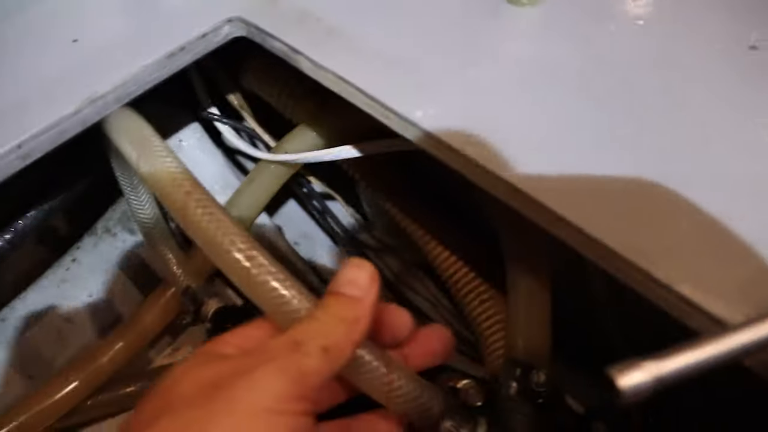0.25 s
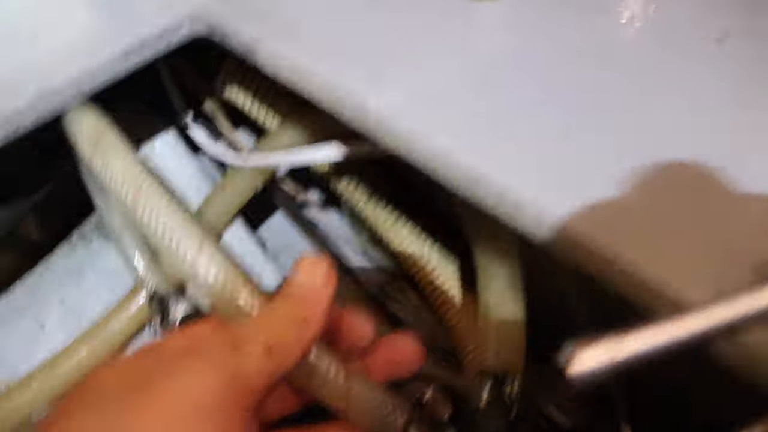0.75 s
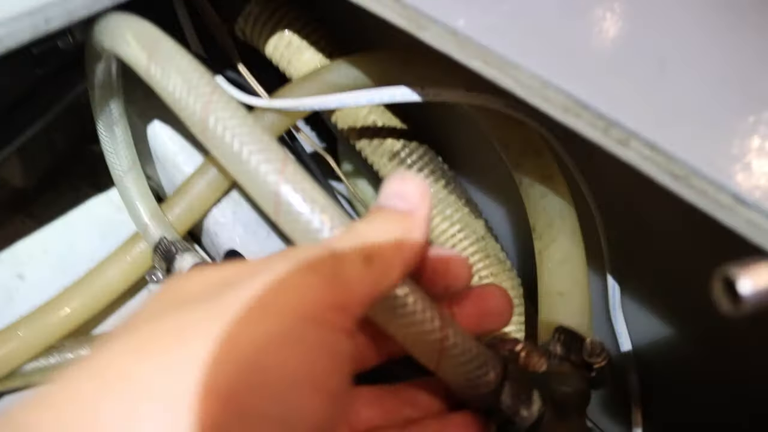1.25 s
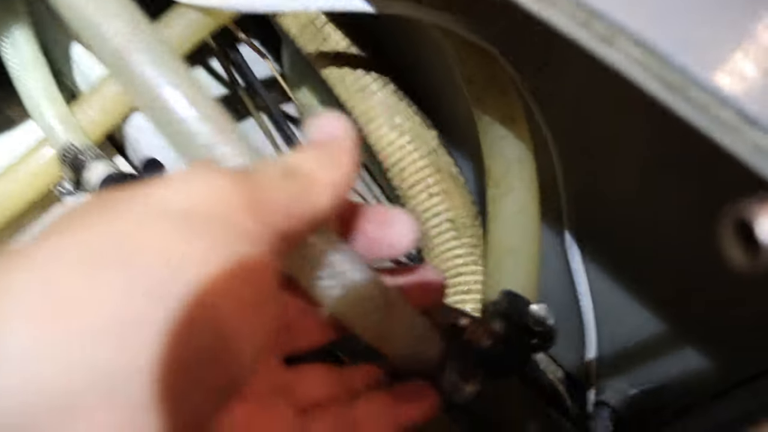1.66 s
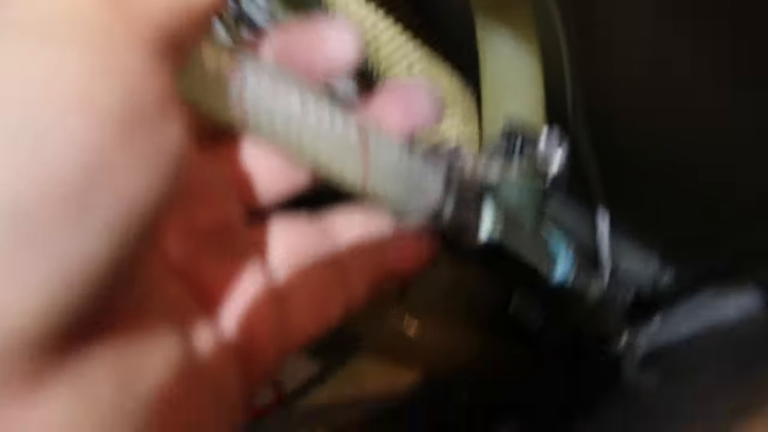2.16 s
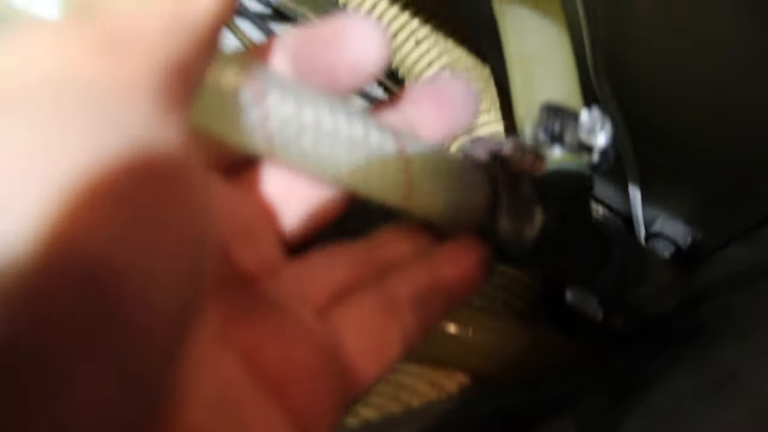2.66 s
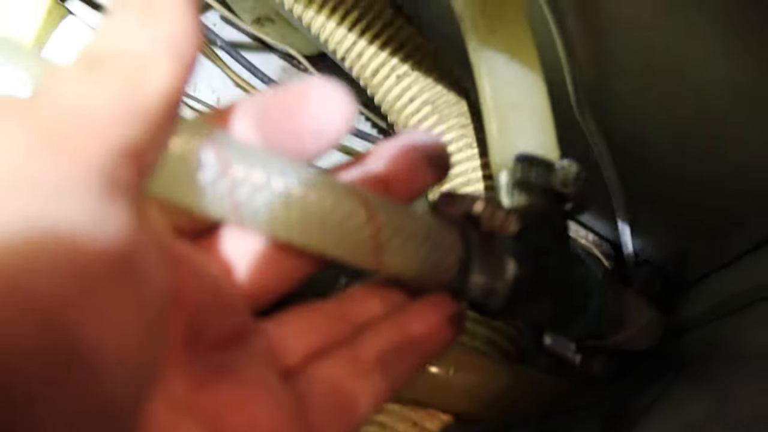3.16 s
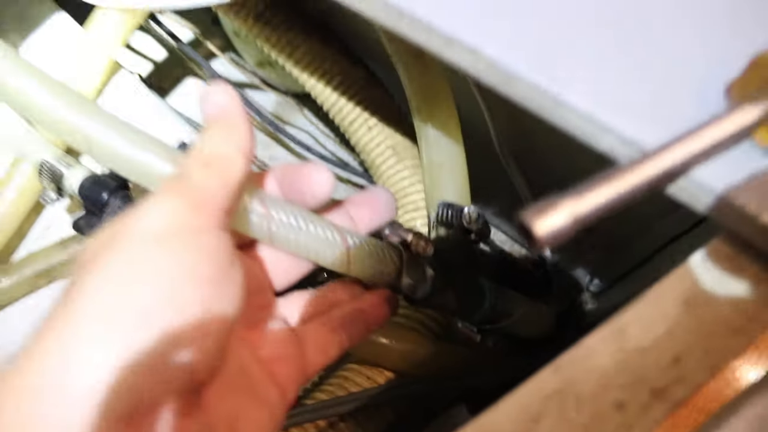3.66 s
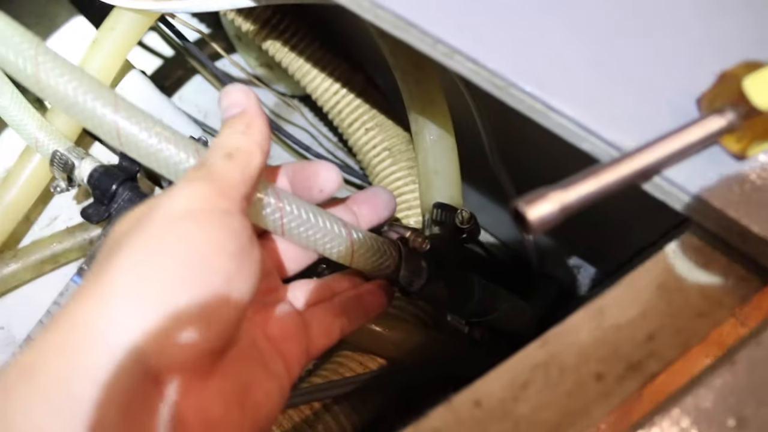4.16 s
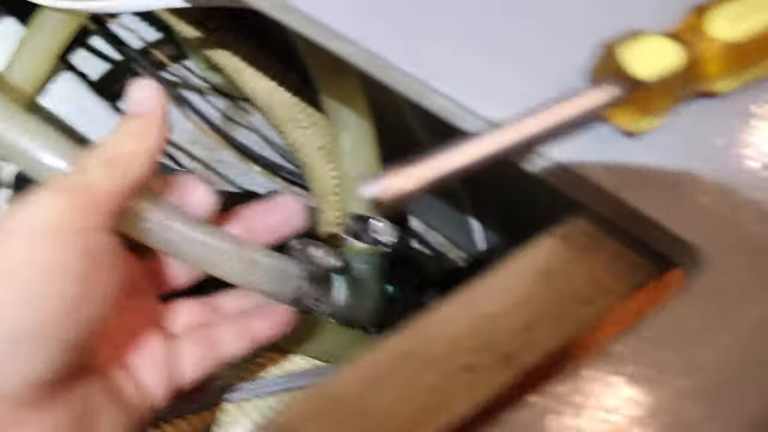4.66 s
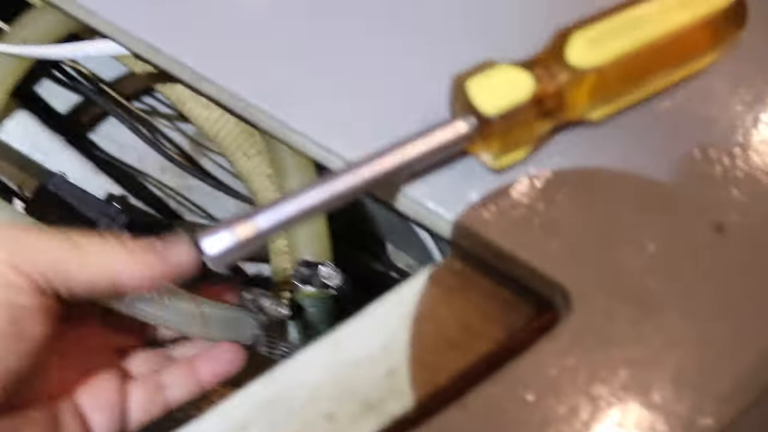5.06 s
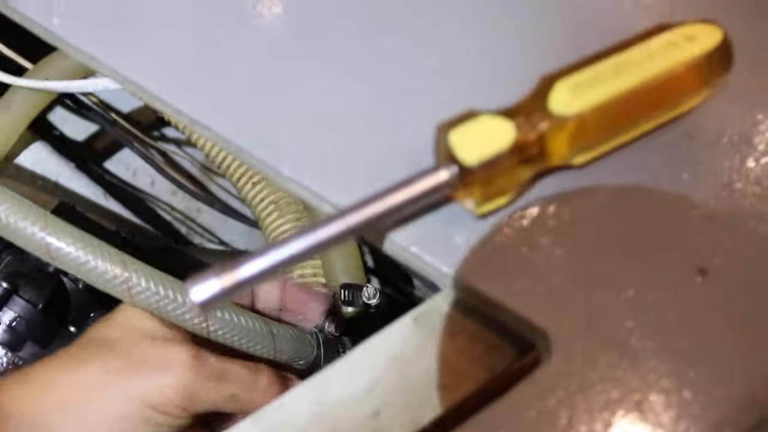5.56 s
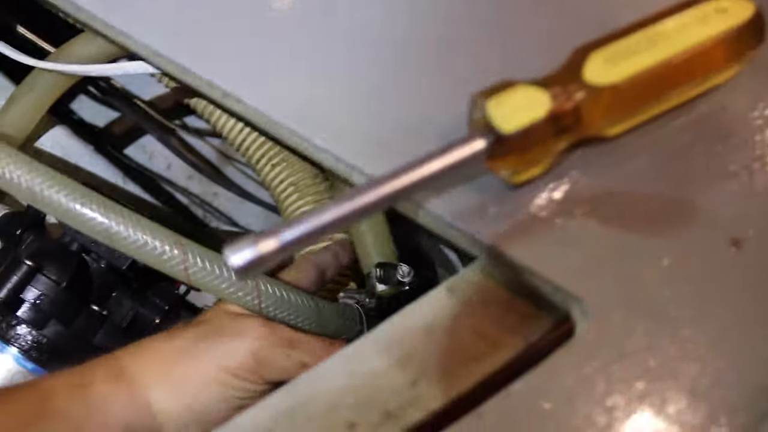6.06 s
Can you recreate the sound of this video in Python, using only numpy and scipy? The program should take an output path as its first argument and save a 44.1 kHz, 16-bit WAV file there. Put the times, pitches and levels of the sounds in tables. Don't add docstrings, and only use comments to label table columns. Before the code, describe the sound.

A small electric water pump runs without stopping under the floor of a boat cabin. Its low buzzing hum carries a fast, regular clatter of valves and a rattling casing, with water rush and a fine motor hiss on top. A sharp tap comes at about one second, a couple more past three, with soft hand bumps between. A handheld microphone moves around the open hatch, so the tone shifts from clicky to fuller and back.

```python
import sys
import numpy as np
from scipy import signal
from scipy.fft import rfft, irfft, next_fast_len
from scipy.io import wavfile
from scipy.ndimage import uniform_filter1d

SR = 44100
rng = np.random.default_rng(int(sys.argv[2]) if len(sys.argv) > 2 else 0)


def convert_level_to_amplitude(level_db):
    exponent = np.asarray(level_db, float) / 20
    return 10 ** exponent


def bounce(signal):
    frames = np.transpose(np.atleast_2d(signal))
    limited = np.clip(frames, -1, 1)
    pcm = np.round(limited * 32767).astype(np.int16)
    wavfile.write(sys.argv[1], SR, pcm)


N = 278830
T = np.arange(N) / SR
REST_TURNS_S = 20
HUM_STEP = 8
FEW = slice(None, None, HUM_STEP)


def level(x, db):
    return x * convert_level_to_amplitude(db) / np.sqrt(np.mean(x ** 2))


def curves(table):
    s, *columns = np.transpose(table)
    return [np.interp(T, s, c) for c in columns]


def colour(x, points):
    hz, db = np.transpose(points)
    size = next_fast_len(N)
    axis = np.log(np.maximum(np.arange(size // 2 + 1) * SR / size, 1))
    gain = convert_level_to_amplitude(np.interp(axis, np.log(hz), db))
    return irfft(rfft(x, size) * gain, size)[..., :N]


def ring(x, hz, width_hz):
    return signal.lfilter(*signal.iirpeak(hz, max(hz / width_hz, .3), fs=SR), x)


def walk(rate, size=1):
    k = max(int(SR / rate / 32), 2)
    held = np.repeat(rng.standard_normal(N // 32 // k + 2), k)
    slow = uniform_filter1d(uniform_filter1d(held, k), k)
    return 1.83 * np.interp(np.arange(0, N, size) / 32, np.arange(len(slow)), slow)


def swell(s, length_s):
    return np.exp(-((T - s) / length_s) ** 2)


def blows(turn, angle, jitter_s, scatter_db):
    count = np.arange(int(turn[-1]) - 1) + angle
    chance = rng.standard_normal((len(count), 2)).T
    at = (np.interp(count, turn, T) + jitter_s * chance[0]) * SR
    return np.bincount(np.clip(at, 0, N - 1).astype(int), convert_level_to_amplitude(scatter_db * chance[1]), N)


def repeating(turn, keep, size):
    fresh = rng.standard_normal((2, int(turn[-1]) + 60, size))
    pattern = signal.lfilter([np.sqrt(1 - keep ** 2)], [1, -keep], fresh, axis=1)
    pattern = pattern[:, 50:].reshape(2, -1)
    return [np.interp(turn * size, np.arange(len(p)), p) for p in pattern]


def ports(x, apart=0, size=5):
    return np.array([x + apart, np.roll(x, size) - apart])


# time in seconds, then levels in dB of being near the pump,
# over the hatch, near the floor and facing the inlet side.
PHONE = [(0, -4, -12, -1.5, 4.5), (.7, -4, -10, -1.5, 2.5), (1.0, -1, -8.5, 0.5, 2),
         (1.28, -1, -6.5, 0.5, 2), (1.5, 0.8, 1, 3, -0.5), (1.9, 0.1, -1, 4.5, 0.5), (2.3, 1, 1, 5.5, -1.5),
         (2.53, 2.5, 5, 4.5, -2), (2.97, 2, 4.5, 4.5, -4.5), (3.11, 2, 2.5, 5, -4.5), (3.4, 4, 2.5, 5, -4),
         (3.65, 4, 0.5, 1.5, -9), (4.15, 3, -1.5, 1.5, -12.5), (4.5, 2.5, 0, 1, -11),
         (4.85, 0.5, -2.5, -2.5, -11), (5.6, -2.5, -3, -5.5, -9), (5.85, -4, -1.5, -6.5, -14),
         (6.32, -4, 0.5, -8.5, -11.5)]
PLACES = np.array(curves(PHONE))
FACING_DB = PLACES[3]
PARTS = {"stroke": (-33.5, -0.5, 0, 1, 0), "second": (-24, 0, 1, 0, 0), "third": (-28, 1, 0, 0, 0),
         "play": (-45, 0.7, 0.12, -0.08, 0.54), "hatch": (-41.5, -3, 1.07, 2, 0.07),
         "low panel": (-53, 1, 0.5, 1, 4.1), "high panel": (-44, -3, 1, 2, 3.5),
         "cover": (-36.5, 1.67, -0.47, 0.35, 0.88), "inlet": (-33, 0.38, 0, 0, 1.93),
         "outlet": (-42.5, 0.62, -0.08, 1.32, -0.5), "rush": (-31.5, 0.46, 0.25, -0.13, 0.27),
         "hiss": (-46.5, -0.26, 0.36, 0.13, 0.1)}


def heard(part):
    base_db, *shares = PARTS[part]
    return base_db + np.dot(shares, PLACES)


# time in seconds, speed in turns per second.
SPEED = [(0.0, 20.268), (0.6, 19.871), (0.95, 20.036), (1.25, 19.841), (1.8, 19.983), (2.45, 20.055),
         (2.8, 20.021), (3.04, 19.905), (3.12, 20.289), (3.28, 20.579), (3.45, 20.511), (4.08, 20.268),
         (4.16, 20.046), (4.45, 19.977), (4.6, 19.872), (4.85, 19.586), (5.2, 19.685), (6.33, 19.69)]


def shaft_speed():
    return curves(SPEED)[0]


# frequency in Hz, density in dB per Hz.
CABIN = [(20, -40), (40, -36), (60, -45), (120, 10), (300, -3.5), (800, -6), (2000, -31.5), (6000, -50)]


def cabin():
    return level(colour(rng.standard_normal(N), CABIN), -46.5) * convert_level_to_amplitude(2.2 * walk(2.46))


# start in seconds, peak in dB, pitch in Hz, crack over ring in dB.
TAPS = [(0.976, -15, 3680, -8.5), (1.807, -46, 8160, -3), (2.043, -43, 8200, -3), (2.939, -42, 9000, 5),
        (2.982, -43, 8950, 5), (3.312, -24, 3960, -1), (3.47, -24, 1800, -28), (4.112, -52, 8000, 3),
        (4.443, -48, 5800, 3), (4.467, -41, 8000, -8), (4.714, -46, 8000, -11), (4.765, -45, 7900, -3),
        (5.03, -45, 10500, 1), (5.699, -47, 14000, 5.5), (5.712, -51, 14000, 1), (5.938, -42, 8800, 3)]


def taps():
    out = np.zeros((2, N))
    size, decay_s = 900, .0046
    for s, db, pitch_hz, crack_db in TAPS:
        crack = .5 * rng.standard_normal((2, size)) * np.exp(-np.arange(size) / SR / decay_s)
        crack[:, [16, 40]] += 2.2
        width_hz = .36 * pitch_hz
        fitting = 3 * ring(ring(crack, pitch_hz, width_hz), pitch_hz, width_hz)
        hose_gain = 4.5 if pitch_hz < 3750 else .5
        hose = hose_gain * ring(ring(crack, 1850, 800), 1850, 1500)
        bright = convert_level_to_amplitude(crack_db) * ring(ring(crack, 4200, 6300), 4500, 8100)
        start = int(s * SR)
        out[:, start:start + size] += convert_level_to_amplitude(db + 2.5) * (bright + fitting + hose)
    return out


# centre in seconds, level in dB, pitch in Hz, length in seconds.
BUMPS = [(0.097, -28, 248, 0.021), (0.538, -41, 430, 0.022), (1.29, -46, 3480, 0.33),
         (5.355, -44, 560, 0.057), (0.682, -36, 134, 0.092), (1.554, -35, 133, 0.12),
         (2.077, -31.5, 171, 0.075), (3.023, -40, 105, 0.24), (4.72, -34.5, 66, 0.04),
         (4.78, -39, 300, 0.027), (5.766, -41, 105, 0.044), (6.176, -37, 103, 0.37),
         (1.206, -38.5, 730, 0.33), (1.548, -42, 890, 0.14), (3.155, -47, 810, 0.11),
         (3.47, -35, 1900, 0.03), (4.122, -53, 774, 0.079)]


def bumps():
    out = 0
    for s, db, pitch_hz, length_s in BUMPS:
        rub = ring(ring(rng.standard_normal(N), pitch_hz, .6 * pitch_hz), pitch_hz, pitch_hz)
        out = out + swell(s, length_s) * level(rub, db)
    return out


# frequency in Hz, width in Hz, gain in dB.
CASING = [
    [(1080, 70, 0), (2360, 96, 3.5), (2550, 37, 13.5), (2884, 53, 10), (3266, 46, 6), (3610, 370, 6.5), (4030, 54, 16)],
    [(1010, 37, 20), (1625, 60, -26), (1922, 22, 4), (2196, 29, -2.5), (2657, 23, -3), (3190, 32, 0), (4280, 110, 8)],
]


def casing(x, side, trim_db=0, least_width_hz=0):
    return x + sum(convert_level_to_amplitude(db + trim_db) * ring(x, hz, max(w, least_width_hz)) for hz, w, db in CASING[side])


# frequency in Hz, density in dB per Hz.
RUSH = [(880, -37), (1500, 1), (1790, 1.5), (2170, 3.5), (2530, 1), (3160, 1.5), (3600, 0.5), (5010, -41),
        (5500, -33), (7150, -44), (12100, -120)]


def water_rush(turn):
    near, far = repeating(turn, .86, size=2048)
    pulse = convert_level_to_amplitude(4.4 * np.cos(6 * np.pi * (turn - .02)) + 0.12 * walk(40))
    rush = colour(ports(near, 0.72 * far) * pulse, RUSH)
    return convert_level_to_amplitude(heard("rush")) * level(casing(rush, 1, trim_db=-1), -2.5)


# frequency in Hz, density in dB per Hz.
HISS = [(3060, 2), (5200, 0), (5680, -4), (6430, -7.5), (7940, -5), (8870, -8), (12900, -10), (15600, -21)]


def brush_hiss(turn):
    bars = convert_level_to_amplitude(0.77 * np.cos(24 * np.pi * (turn - .03)))
    brush = level(ring(ring(bars * rng.standard_normal((2, N)), 5050, 270), 4830, 500), -8)
    load_db = 0.77 * np.cos(6 * np.pi * (turn - .05)) + 0.63 * np.cos(2 * np.pi * (turn - .8))
    sparks = convert_level_to_amplitude(load_db + 0.81 * walk(150) + 0.25 * walk(5.8))
    hiss = level(colour(sparks * rng.standard_normal((2, N)), HISS), 4.82)
    return convert_level_to_amplitude(heard("hiss")) * (brush + hiss)


# frequency in Hz, density in dB per Hz.
RATTLE = [(120, -51), (200, -25), (343, -33), (410, -4), (626, -23), (711, -5), (860, -11.5), (1000, -3),
          (1210, -6.5), (1350, -20), (1520, -18), (2500, -13.5), (3250, -58), (5500, -120)]


def rattle(turn):
    near, far = (colour(x, RATTLE) for x in repeating(turn, .93, size=512))
    return convert_level_to_amplitude(heard("play")) * level(ports(near, .5 * far), 7.7)


# frequency in Hz, width in Hz.
PANELS = [
    (716, 78),
    (795, 99),
    (1350, 98),
]
# angle in turns, panel level in dB, cover level in dB, dB per dB of facing.
THUDS = [(0.069, -8, -4, -0.26), (0.341, -11, -10, -0.54), (0.609, -12, 1.9, -0.6), (.68, 11, -8, -0.56),
         (0.761, -3, -4, 1), (0.879, -10, -6.5, -0.64)]


def plate_thuds(turn):
    panel, cover = 0, 0
    for angle, panel_db, cover_db, share in THUDS:
        thud = blows(turn, angle, jitter_s=.00005, scatter_db=1) * convert_level_to_amplitude(share * FACING_DB)
        panel = panel + convert_level_to_amplitude(panel_db) * thud
        cover = cover + convert_level_to_amplitude(cover_db) * thud
    push = np.hanning(260) * np.sin(2 * np.pi * PANELS[2][0] * np.arange(260) / SR)
    cover = signal.oaconvolve(cover, push, "same")
    levels_db = heard("low panel"), heard("high panel") - 9, heard("cover") - 4
    body = 0
    for x, db, (hz, width_hz) in zip((panel, panel, cover), levels_db, PANELS):
        body = body + convert_level_to_amplitude(db) * level(ring(ring(x, hz, width_hz), hz, 3 * width_hz), 0)
    return convert_level_to_amplitude(1.5) * ports(body)


# angle in turns, side (0 inlet, 1 outlet), click in dB, pitch in Hz, dB per dB of facing.
VALVES = [(.13, 0, -6, 3300, .1), (.465, 0, 1.5, 2900, -.25), (.80, 0, -2.5, 3600, .3),
          (.12, 1, -5, 3050, .4), (.975, 1, -4, 3300, .5), (.47, 1, -3, 3000, .8), (.29, 1, -1, 3150, .3),
          (.63, 1, -2.5, 3050, -.3), (.70, 1, -11, 1900, -.3), (.79, 1, -5, 3100, -.3),
          (.95, 1, -5, 2200, -.15)]


def valve_snaps(turn):
    snaps = [0, 0]
    age = np.arange(700) / SR
    water = rng.standard_normal((2, N))
    for angle, outlet, click_db, pitch_hz, share in VALVES:
        outlet = int(outlet)
        snap_s, seat_gain, seat_hz = (.0016, 20, 2400) if outlet else (.001, 75, 3100)
        hit = blows(turn, angle, jitter_s=.00005, scatter_db=1.1) * convert_level_to_amplitude(share * FACING_DB)
        shape = age / snap_s * np.exp(-2 * age / snap_s)
        shape = level(shape + .3 * np.roll(shape, 170), 0)
        slap = signal.oaconvolve(hit, shape * np.sin(2 * np.pi * pitch_hz * age))[:N]
        slap = slap + seat_gain * ring(hit, seat_hz, 2700)
        echo = .5 * np.roll(slap, 61)
        spray = ring(water * signal.oaconvolve(hit, shape)[:N], pitch_hz, 2200)
        snaps[outlet] = snaps[outlet] + convert_level_to_amplitude(click_db) * (ports(slap, echo, size=3) + convert_level_to_amplitude(-8) * spray)
    shell = signal.butter(3, (1250, 4300), "band", fs=SR, output="sos")
    out = 0
    for side, part in enumerate(("inlet", "outlet")):
        snap = signal.sosfilt(shell, snaps[side])
        out = out + convert_level_to_amplitude(heard(part)) * level(casing(snap, side, least_width_hz=25), -4)
    return out


# time in seconds, length in seconds, shaft order, depth in dB.
NODES = [(.09, 0.058, 9, -1.5), (0.337, 0.16, 6, -24), (0.607, 0.036, 9, -7), (1.63, 0.17, 3, -5),
         (2.53, .12, 3, -1), (4.65, 0.046, 3, -6), (4.87, 0.031, 9, -3), (5.672, 0.052, 6, -4.5),
         (5.81, 0.037, 3, 2), (5.81, 0.031, 9, 1), (6.005, .05, 3, -5), (6.22, 0.057, 6, -6)]


def nodes(order):
    return sum(db * swell(s, length_s) for s, length_s, k, db in NODES if round(k) == order)


# shaft order, level in dB, dB per dB of floor, dB per dB of facing,
# dB per turn a second.
ORDER = [(4, -56, 0.73, 0.11, 3), (5, -46, 0.69, -0.015, -3), (7, -39.5, -0.13, 0.12, 4.5),
         (8, -36, -0.1, -0.022, 0), (10, -41.5, -0.35, -0.098, -5), (11, -46.5, -0.57, 0.78, -9),
         (12, -40.5, 0.92, 0.065, -10), (13, -42.5, -0.22, 0.73, 1), (14, -55, -0.44, 0.36, -9),
         (15, -45.0, 0.45, -0.16, -6)]
SINGING = [(16, -52, 0.57, 0.41, -2), (17, -53, -0.6, 0.49, -2), (18, -50.5, 0.46, 0.17, -2.5),
           (19, -48, 0.18, 0.37, 6), (20, -50, 0.45, -0.19, 3.5), (22, -47.5, 0.71, 0.39, -11.5),
           (23, -57.5, -0.29, 0.29, -1), (24, -50.5, -0.29, 0.32, 3), (25, -58, -0.39, 0.33, 12),
           (26, -54.0, -0.22, 0.51, 3), (27, -52, 0.67, 0.68, -4), (28, -48, 0.81, 0.71, -3),
           (29, -53.5, 0.003, 0.5, 7), (30, -53.5, -0.095, 1, 1), (31, -58.5, -0.073, -0.21, 14),
           (32, -51.0, 1.35, 0.72, -7), (33, -49, 0.19, 0.81, 10), (34, -60.5, -0.03, -0.47, 11),
           (35, -42.5, 0.32, 0.062, 10.5), (36, -52, -0.23, -0.04, -11), (37, -51.5, 0.62, -0.22, -16.5),
           (38, -56, 0.83, -0.31, 9), (39, -43.0, 0.99, 0.24, -3), (40, -44.5, 1.57, 0.16, -6),
           (41, -53, 0.88, -0.03, -10), (42, -52.5, -0.66, 0.26, 0), (43, -51.5, -0.2, 0.3, 0),
           (44, -57.5, -0.31, -0.43, -5), (45, -58.5, 1.4, 0.15, -7), (52, -51.0, 0.95, 0.62, 0),
           (57, -51.5, 0.25, 0.61, -1)]
FLIPS = (7, 8, 9, 16, 20, 23, 27, 29)


def shaft_orders(turn, faster):
    _, _, floor_db, facing_db = PLACES[:, FEW]
    lead_rad, swing_rad_per_db = .95, -.22
    angle = 2 * np.pi * (turn - .78)
    out = 0
    for k, db, low, side, rise_db in list(ORDER) + list(SINGING):
        k = round(k)
        db = db + low * floor_db + side * facing_db + rise_db * faster
        db = db + 0.28 + 1.38 * walk(2.49, size=HUM_STEP)
        phase = lead_rad + np.pi * np.searchsorted(FLIPS, k, "right")
        if k in (7, 13) or k > 16:
            phase = phase + swing_rad_per_db * facing_db
        loose = 0.018 * k * walk(1.46, size=HUM_STEP)
        out = out + np.sqrt(2) * convert_level_to_amplitude(db) * np.cos(k * angle + phase + loose)
    return out


def hum(turn):
    speed = shaft_speed()[FEW]
    faster = speed - REST_TURNS_S
    angle = 2 * np.pi * (turn[FEW] + 0.0622)
    out = shaft_orders(turn[FEW], faster)
    for k, part, lag, rise_db in ((3, "stroke", 0, 6), (6, "second", .35, 0), (9, "third", 0, 0)):
        db = (heard(part) + nodes(order=k))[FEW] + rise_db * faster
        out = out + np.sqrt(2) * convert_level_to_amplitude(db) * np.cos(k * angle - lag)
    hatch_hz, hatch_width_hz = 423.3, 5.7
    detuning = (21 * speed - hatch_hz) / hatch_width_hz
    hatch_db = heard("hatch")[FEW] - 10 * np.log10(1 + detuning ** 2)
    out = out + convert_level_to_amplitude(hatch_db + 2) * np.cos(21 * angle)
    return signal.resample_poly(out, HUM_STEP, 1)[:N]


def scene():
    turn = np.cumsum(shaft_speed()) / SR
    tone = hum(turn)
    out = ports(tone + cabin(), 0.065 * (tone - np.roll(tone, 30)))
    out = out + taps() + bumps()
    out = out + water_rush(turn) + brush_hiss(turn) + rattle(turn)
    return out + plate_thuds(turn) + valve_snaps(turn)


# frequency in Hz, left minus right in dB.
PORTS = [(60, 2), (110, 2.5), (200, 2), (380, 2), (700, -0.5), (1290, 5.5), (2380, 0.5), (4400, 3),
         (8120, 7.5), (15000, 1)]


def port_response(dry):
    hz, db = np.transpose(PORTS)
    return np.array([colour(x, np.transpose([hz, half_db])) for x, half_db in zip(dry, (db / 2, -db / 2))])


def low_pass(x):
    return signal.sosfilt(signal.butter(12, 15770, fs=SR, output="sos"), x)


def record(dry):
    wet = port_response(dry)
    wet = signal.sosfilt(signal.ellip(8, .2, 60, 15700, fs=SR, output="sos"), wet)
    return low_pass(wet)


dry = scene()
out = record(dry)
bounce(out)
```